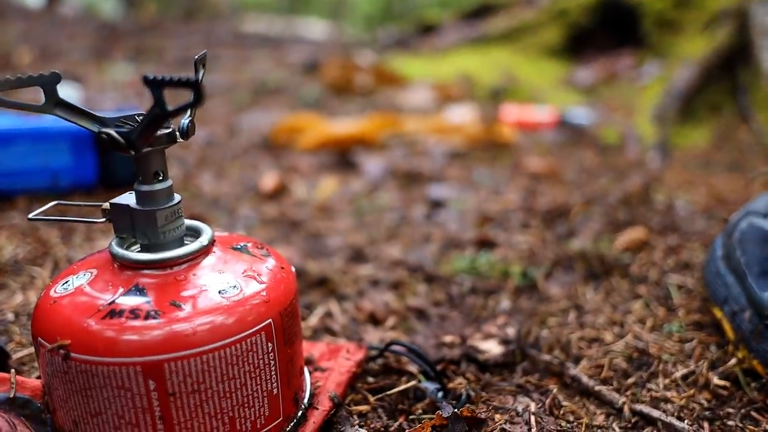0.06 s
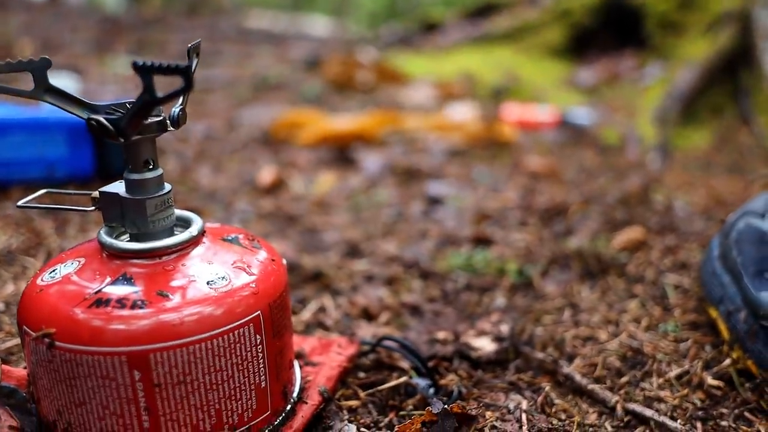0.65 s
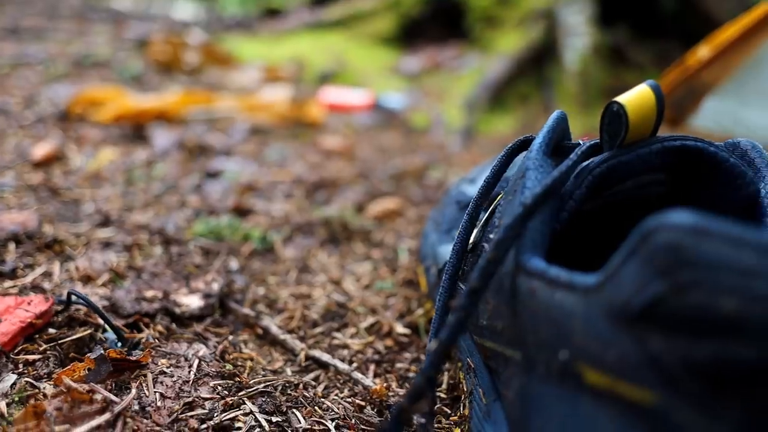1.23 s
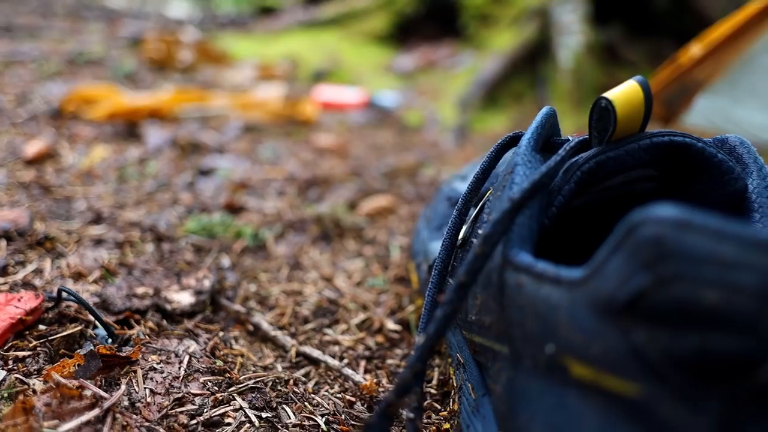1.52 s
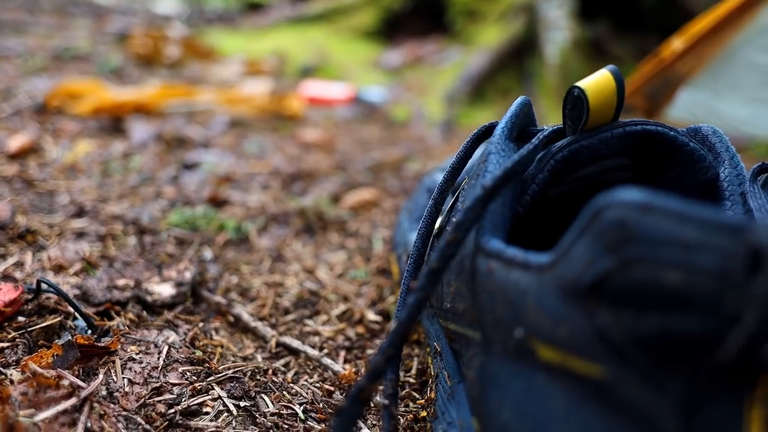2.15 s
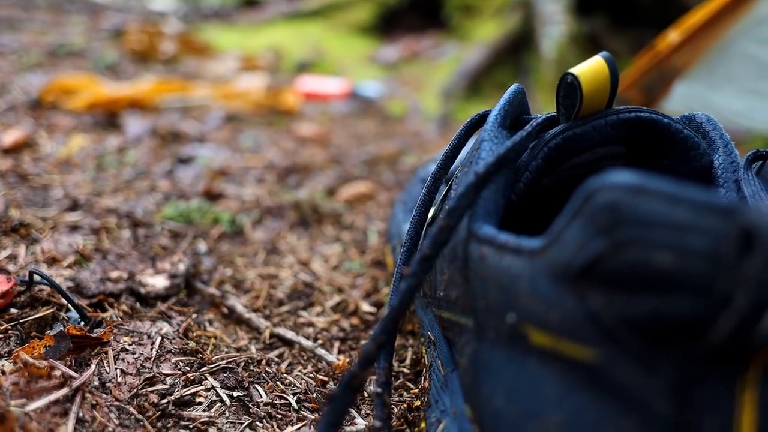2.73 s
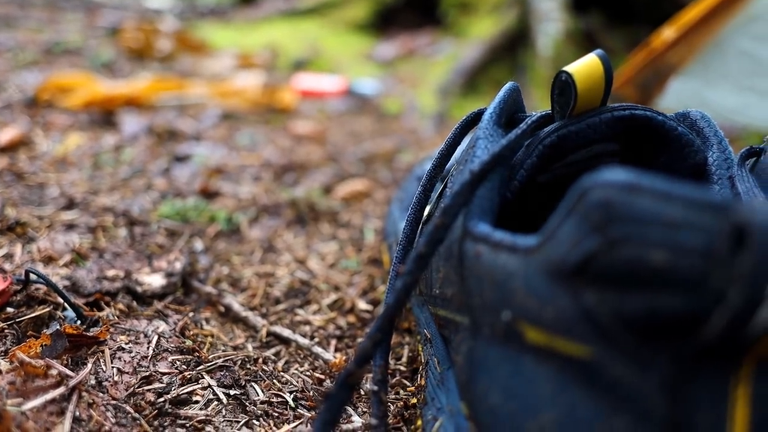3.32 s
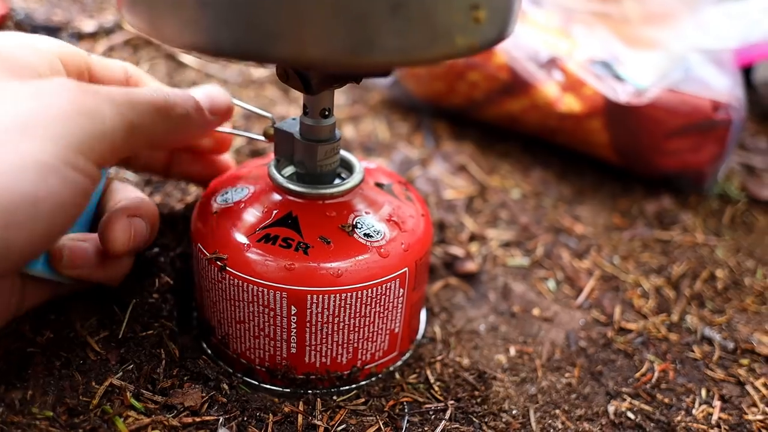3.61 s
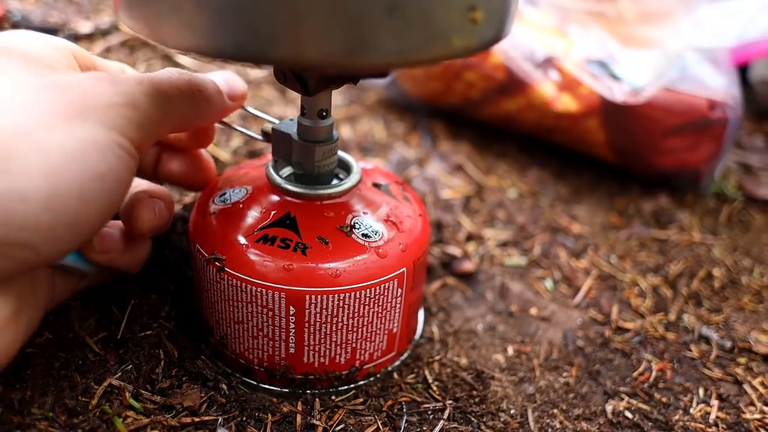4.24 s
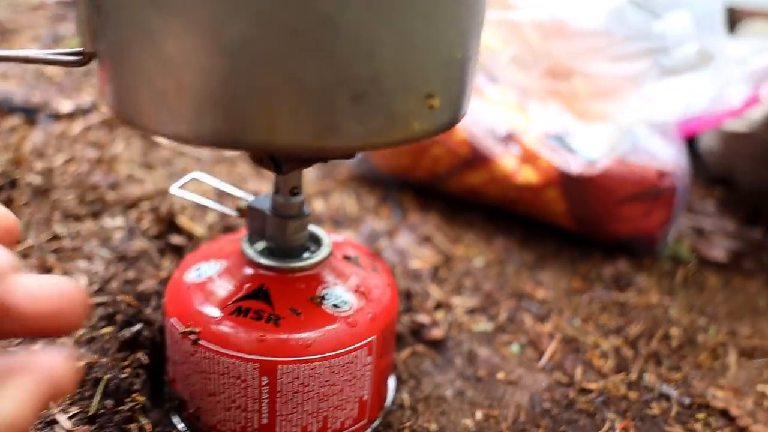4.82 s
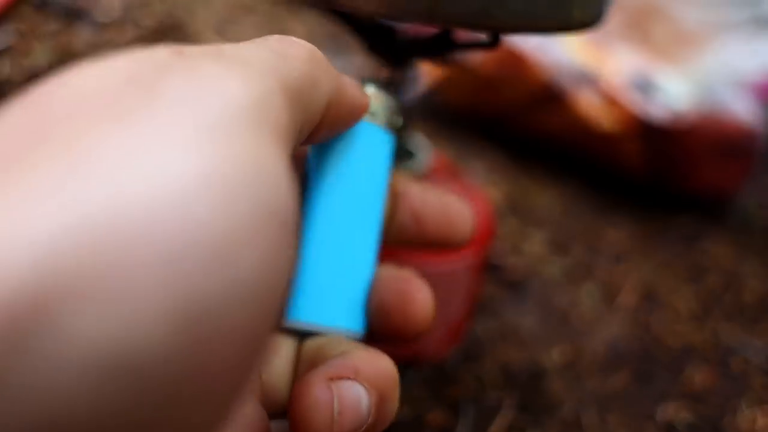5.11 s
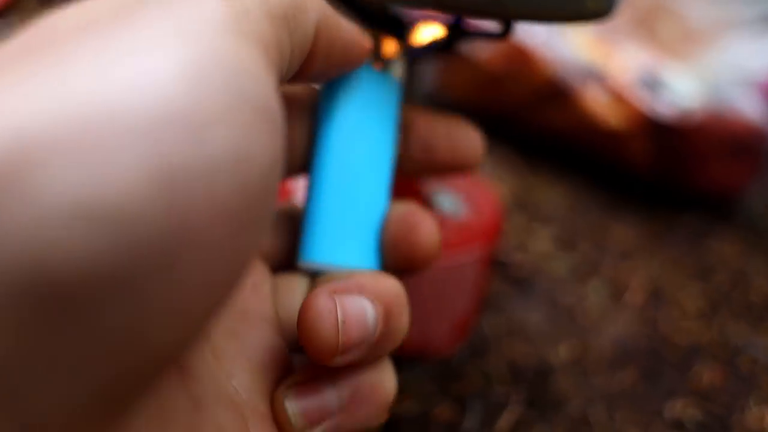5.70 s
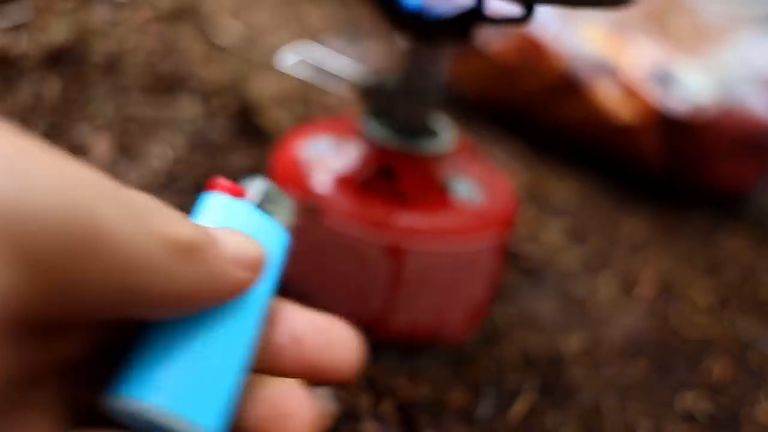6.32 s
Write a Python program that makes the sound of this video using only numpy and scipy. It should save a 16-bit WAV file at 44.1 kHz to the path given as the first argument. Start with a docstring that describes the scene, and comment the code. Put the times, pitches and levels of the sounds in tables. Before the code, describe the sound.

Soft forest air opens, with wind rumbling on the microphone, a few dry ticks in the ground litter and a small bird's thin, high phrase echoing among trees. The background turns quieter and another bird calls faintly, far off. Then a camping stove's valve opens close by with a steady, bright gas hiss. A lighter flame flutters softly, the gas catches with a pop and a low roar, and the lighter clicks once.

```python
"""A canister stove at a forest campsite: its gas jet hisses through the burner's resonances from 4.2 s.
A lighter flame flutters in the stream, the gas catches with a pop and roars, and the lighter clicks once.
Before that: forest air, gusts on the microphone, ticks in the litter and a small bird's thin, high phrase
echoing among the trees. At 3.4 s the scene cuts to a second shot with quieter forest air, and another
bird calls far off."""
import sys
import numpy as np
from scipy import signal
from scipy.fft import rfft, irfft
from scipy.io import wavfile

SR = 44100
rng = np.random.default_rng(int(sys.argv[2]) if len(sys.argv) > 2 else 0)


def master(y):
    """Save y as 16-bit WAV."""
    cut = np.clip(np.atleast_2d(y).T, -1, 1)
    pcm = np.round(cut * 32767)  # scale
    wavfile.write(sys.argv[1], SR, pcm.astype(np.int16))


N = 284886
IGNITION_S = 6.1105


def from_db(db):
    return 10 ** (np.asarray(db) / 20)


def seconds():
    return np.arange(N) / SR


def rms_one(x):
    return x / np.sqrt(np.mean(x ** 2) + 1e-20)


def switch(at_s, fade_s):
    """Linear 0-to-1 ramp centred on at_s."""
    return np.clip((seconds() - at_s) / fade_s + .5, 0, 1)


def swells(rows):
    """Sum of Gaussian gain bumps. Each row: centre in seconds, peak in dB, sigma in seconds."""
    return sum(from_db(db) * np.exp(-.5 * ((seconds() - s) / sigma_s) ** 2) for s, db, sigma_s in rows)


def drift(rate_hz):
    """Smoothed random steps, eight per cycle; rms 1."""
    steps = seconds() * rate_hz * 8
    smoothed = signal.lfilter([1], [1, -1, .25], rng.standard_normal(N // 4))[20:]
    return rms_one(np.interp(steps, np.arange(len(smoothed)), smoothed))


def coloured_noise(spectrum):
    """Noise shaped by (Hz, dB) points; rms 1."""
    hz, db = np.transpose(spectrum)
    gain = from_db(np.interp(np.log(np.fft.rfftfreq(N, 1 / SR) + 1), np.log(hz), db))
    return rms_one(irfft(rfft(rng.standard_normal(N)) * gain, N))


def resonate(x, hz, width_hz):
    """Resonator applied twice: unity peak, steep skirts."""
    b, a = signal.iirpeak(min(hz, .45 * SR), hz / (1.5 * width_hz), fs=SR)
    return signal.lfilter(b, a, signal.lfilter(b, a, x + 1e-18))


def forest(cut_s):
    """Distant air, handling bumps and wind rumble on the microphone; a quieter second shot from cut_s."""
    # Air spectra. Each row: frequency in Hz, relative density in dB.
    air_spectrum = [(35, -47), (60, -5), (118, -1.5), (183, -0.5), (266, -2.5), (359, -7), (1100, -8),
                    (1630, -12.5), (3930, -17), (4850, -19), (7540, -21.5), (8870, -24), (15500, -28.5)]
    second_shot_spectrum = [(30, -14), (60, -1), (300, -2.5), (620, -6), (1000, -9.5), (1500, -11.5),
                            (3500, -16), (4700, -14.5), (6000, -20.5), (15500, -26)]
    # Soft bumps and gusts. Each row: centre in seconds, peak in dB, sigma in seconds.
    bumps = [(0.04, -45, 0.032), (0.205, -45, 0.054), (3.38, -48, 0.02)]
    gusts = [(0.3, -49.5, 0.22), (0.9, -45, 0.038), (1.242, -41.5, 0.04), (1.43, -46, 0.03),
             (1.76, -38.5, 0.046), (2.8, -46, 0.37), (3.34, -39.5, 0.086), (4.32, -53, 0.06),
             (4.8, -49.5, 0.08)]
    air_db = -46 + 2 * np.exp(-seconds() / 0.61)
    air = from_db(air_db) * coloured_noise(air_spectrum)
    handling = swells(bumps) * rms_one(resonate(rng.standard_normal(N), 264, 32))
    second_shot_air = from_db(-55) * coloured_noise(second_shot_spectrum)
    sway_hz = 27.5 + 5 * drift(11)  # the microphone sways on its mount
    sway = rms_one(np.sin(2 * np.pi * np.cumsum(sway_hz) / SR) * from_db(3.5 * drift(10)))
    wind = from_db(-49) + swells([gust for gust in gusts if gust[0] < cut_s])
    breeze = from_db(-54.5) + swells([gust for gust in gusts if gust[0] > cut_s])
    after_cut = switch(cut_s, 0.0064)
    first_shot = air + handling + wind * sway
    return (1 - after_cut) * first_shot + after_cut * (second_shot_air + breeze * sway)


def litter_ticks(gain_db, decay_s):
    """Dry snaps in the forest litter: a bright crack over a dull body."""
    # Each row: start in seconds, relative level in dB, body re crack in dB.
    snaps = [(0.046, -28.5, 6), (0.1326, -30.5, 9.5), (0.2131, -30.5, 8), (0.476, -39, 1),
             (0.8606, -30.5, 7), (1.0669, -33, -3)]
    crack, body = np.zeros((2, N))
    for start_s, db, body_db in snaps:
        age_s = seconds() - start_s
        force = from_db(db + gain_db) * (age_s >= 0) * np.exp(-np.abs(age_s) / decay_s)
        crack += force
        body += from_db(body_db) * force
    grit = rng.standard_normal(N)
    return resonate(crack * grit, 8100, 1300) + resonate(body * grit, 880, 1030)


def note(start_s, length_s, pitches_hz, db, rasp_hz, attack_s, release_s, fade_db_per_s=0):
    """Sine on a parabola through first, middle and last pitch, roughened by the signal rasp_hz."""
    at = np.arange(int(start_s * SR), int((start_s + length_s) * SR))
    age_s = (at - at[0]) / SR
    hz = np.polyval(np.polyfit([0, .5, 1], pitches_hz, 2), age_s / length_s) + rasp_hz[at]
    gate = np.clip(np.minimum(age_s / attack_s, (length_s - age_s) / release_s), 0, 1)
    out = np.zeros(N)
    out[at] = from_db(db - fade_db_per_s * age_s) * gate * np.sin(2 * np.pi * np.cumsum(hz) / SR)
    return out


def among_trees(x, t60_s, wet_db):
    """Trunks scatter a decaying cloud of echoes."""
    t = np.arange(SR) / SR
    echoes = rng.standard_normal(SR) * from_db(-60 * t / t60_s) * (1 - np.exp(-t / 0.0017))
    wet = signal.fftconvolve(x, echoes / np.linalg.norm(echoes))[:N]
    return x + from_db(wet_db) * wet


def near_bird(gain_db, edge_s, rasp_rate_hz):
    """Curved whistles and raspy chips; each chip is a quick flick, then a louder note."""
    # Each row: start and length in seconds, first, middle and last pitch in Hz, relative level in dB,
    # attack in seconds.
    whistles = [(0.857, 0.046, 6700, 6840, 6740, -37, 0.004), (1, 0.057, 6750, 6850, 6840, -36.5, 0.008),
                (1.146, 0.268, 8420, 7855, 8140, -33, 0.0089), (1.493, 0.2, 8570, 8170, 8380, -34, 0.063),
                (1.791, 0.215, 10010, 10410, 10980, -49.5, 0.043)]
    # Each row: start and length in seconds, pitch in Hz, relative level in dB, flick and note sweep in Hz.
    chips = [(0.507, 0.036, 7830, -51.5, -200, -200), (0.902, 0.026, 6170, -37, -2400, -1450),
             (1.051, 0.023, 6230, -35, -2900, -1100), (1.408, 0.0326, 6740, -32, 1400, -50),
             (1.705, 0.038, 6720, -36.5, 1400, -100)]
    flick_s, chip_edge_s = 0.019, 0.0066
    slope, arch_hz = np.array([-.5, 0, .5]), np.array([-198, 0, -198])
    song, rasp = np.zeros(N), drift(rasp_rate_hz)
    for start_s, length_s, *pitches_hz, db, attack_s in whistles:
        song += note(start_s, length_s, pitches_hz, db, 48.3 * rasp, attack_s, edge_s, fade_db_per_s=31)
    for start_s, length_s, hz, db, flick_sweep_hz, sweep_hz in chips:
        flick_hz = hz - 250 + arch_hz + flick_sweep_hz * slope
        note_hz = hz + arch_hz + sweep_hz * slope
        song += note(start_s, flick_s, flick_hz, db - 3, 600 * rasp, chip_edge_s, chip_edge_s)
        song += note(start_s + flick_s, length_s, note_hz, db, 340 * rasp, edge_s, chip_edge_s)
    return from_db(gain_db) * among_trees(song, t60_s=0.44, wet_db=0.5)


def far_bird(edge_s, waver_rate_hz):
    """Held, wavering notes that arrive mostly as echoes."""
    # Each row: start and length in seconds, pitch in Hz, direct level in dB.
    notes = [(3.45, 0.3, 5500, -79), (3.53, 0.08, 4750, -63), (3.58, 0.16, 4230, -73),
             (3.76, 0.12, 4750, -68)]
    waver_hz = 65 * drift(waver_rate_hz)
    calls = sum(note(start_s, length_s, [hz] * 3, db, waver_hz, edge_s, edge_s)
                for start_s, length_s, hz, db in notes)
    return among_trees(calls, t60_s=0.7, wet_db=7)


def jet_gains(valve_open_s=4.1964, rise_db_per_s=249, lit_fade_db_per_s=14):
    """Tube, core and top band gains: raised by the valve, sinking once lit; the hand shades the treble."""
    # Each row: time in seconds, relative core and top band levels in dB.
    shading = [(4.2, -21, -36.5), (4.29, -19.5, -34.5), (4.44, -23.5, -31.5), (4.62, -21, -30),
               (4.66, -18, -33), (4.72, -21.5, -32.5), (4.94, -22.5, -32.5), (5.02, -25.5, -38.5),
               (5.46, -24.5, -34.5), (5.6, -27.5, -34), (5.82, -29, -39.5), (6.21, -25.5, -40.5)]
    t = seconds()
    times_s, core_points_db, top_points_db = np.transpose(shading)
    flow_db = -rise_db_per_s * np.clip(valve_open_s - t, 0, 1)
    flow_db -= lit_fade_db_per_s * np.maximum(t - IGNITION_S, 0)
    flame_damping_db = 0.5 * switch(IGNITION_S, 0.055)
    tube_db = -36.5 + 0.57 * flow_db  # mixing tube drone
    core_db = np.interp(t, times_s, core_points_db) + flow_db
    top_db = np.interp(t, times_s, top_points_db) + 0.99 * flow_db - flame_damping_db
    return from_db(tube_db), from_db(core_db), from_db(top_db)


def burner_hiss(modes, gain_db, wander_db, shared):
    """Jet turbulence drives the burner's modes; its shared part cancels between them, leaving notches."""
    common = np.sqrt(shared) * rng.standard_normal(N)
    turbulence = common + np.sqrt(1 - shared) * rng.standard_normal((2, N))
    wanders = [from_db(wander_db * drift(3)) for _ in range(4)]
    tube, core, top = np.zeros((3, N))
    for k, (hz, width_hz, db) in enumerate(modes):
        band = tube if hz < 4600 else core if hz < 9350 else top
        band += from_db(db) * wanders[k % 4] * resonate(turbulence[k % 2], hz, width_hz)
    tube_gain, core_gain, top_gain = jet_gains()
    hiss = tube_gain * rms_one(tube) + core_gain * rms_one(core) + top_gain * rms_one(top)
    return from_db(gain_db) * hiss


def past_hand(x):
    """Close echoes off the moving hand comb the sound."""
    # Each row: start, end and lag in seconds, echo-to-direct ratio.
    reflections = [(3.9, 4.6, 0.00099, 0.2), (4.65, 4.96, 0.00029, 0.27), (5.75, 5.98, 0.000537, 0.2),
                   (5.9, 6.3, 0.000372, 0.18)]
    hz, out = np.fft.rfftfreq(N, 1 / SR), x.copy()
    for start_s, end_s, lag_s, ratio in reflections:
        echo = irfft(rfft(x) * np.exp(-2j * np.pi * hz * lag_s), N)
        out += ratio * switch(start_s, .1) * (1 - switch(end_s, .1)) * echo
    return out


def gas(shield_s):
    """The hiss changes colour as the hand shields the burner, and again once it is lit."""
    # Burner resonances per state. Each row: frequency and width in Hz, relative level in dB.
    open_modes = [(720, 310, -31.5), (1770, 630, -29.5), (3460, 1170, -15), (3830, 260, -20),
                  (5130, 280, -26), (5440, 430, -12), (6550, 380, -4.5), (7240, 560, -5.5), (7970, 360, 2),
                  (8620, 240, 0.5), (8880, 420, -1), (9870, 900, -14.5), (10230, 640, -10.5),
                  (11140, 330, -16), (11800, 800, -18), (14100, 1000, -23.5), (15500, 1000, -24)]
    shielded_modes = [(685, 350, -23), (1680, 700, -20), (3414, 760, -5.5), (3940, 340, -14),
                      (5240, 310, -12.5), (5580, 230, -6), (6260, 130, -23), (7020, 560, 0.5),
                      (7390, 110, 3), (7960, 360, 4), (8330, 320, -0.5), (8580, 330, 1.5), (9360, 260, -2),
                      (10000, 530, -5), (11000, 400, -12), (11440, 1000, -15), (13900, 1400, -17.5),
                      (15400, 900, -22)]
    lit_modes = [(3490, 640, -7), (4140, 850, -14.5), (5450, 270, -11), (6430, 350, -0.5), (6790, 460, 2),
                 (7530, 76, 1), (7880, 360, 1.5), (8620, 240, 4.5), (9320, 530, -6.5), (10800, 900, -24),
                 (12800, 910, -17), (13650, 700, -17), (15000, 1200, -22)]
    free = burner_hiss(open_modes, gain_db=0.72, wander_db=1.7, shared=0.25)
    shielded = burner_hiss(shielded_modes, gain_db=0.54, wander_db=1.0, shared=0.44)
    burning = burner_hiss(lit_modes, gain_db=-0.6, wander_db=1.5, shared=0.36)
    near, lit = switch(shield_s, 0.059), switch(IGNITION_S, 0.055)
    hiss = np.sqrt(1 - near) * free + np.sqrt(near * (1 - lit)) * shielded + np.sqrt(lit) * burning
    sputter_db = 0.5 + 0.7 * lit  # the flame shakes the hiss
    return past_hand(hiss) * from_db(sputter_db * drift(39.7))


def lighter_flame():
    """The gas stream tears at the small flame in short, dull puffs."""
    # Each row: centre in seconds, peak in dB, sigma in seconds.
    puffs = [(5.015, -37, 0.0021), (5.041, -41, 0.0055), (5.122, -43, 0.007), (5.177, -38.5, 0.0048),
             (5.22, -47.5, 0.029), (5.696, -38.5, 0.011), (5.728, -34, 0.0061), (5.782, -38.5, 0.013),
             (5.858, -34.5, 0.006), (5.956, -39, 0.024), (6.020, -34, 0.014), (6.089, -32.5, 0.022)]
    spectrum = [(30, -11), (80, 2.5), (150, 0), (330, -7.5), (520, -23), (1000, -25), (3000, -26),
                (8000, -80)]
    return swells(puffs) * coloured_noise(spectrum)


def ignition(gain_db):
    """Pooled gas flares in a quick pop and a slower surge, each a pressure peak between two dips."""
    # Each row: centre in seconds, relative peak in dB, width in seconds.
    pulses = [(6.1105, -1.5, 0.0015), (6.1285, -15, 0.0052)]
    out = np.zeros(N)
    for centre_s, db, width_s in pulses:
        u = (seconds() - centre_s) / width_s
        out += from_db(db + gain_db) * (1 - u ** 2) * np.exp(-u ** 2 / 2)
    return out


def flame_strength(fade_db_per_s=2, rise_s=0.049):
    """Flame envelope: a flash as the gas catches, then a slowly fading burn."""
    age_s = np.maximum(seconds() - IGNITION_S, 0)
    ripple_s = seconds() - 5.3  # the ripple is all but gone by ignition
    ripple_db = 6.5 * np.cos(2 * np.pi * ripple_s / 0.104) * np.exp(-np.maximum(ripple_s, 0) / 0.13)
    flash = swells([(IGNITION_S, -15, 0.0056)])
    return flash + from_db(-24 - fade_db_per_s * age_s + ripple_db) * switch(IGNITION_S, rise_s)


def roar(gain_db, rough_db, notch_hz):
    """Uneven bursts of burning gas resound between burner, pot and ground, with one midrange notch."""
    # Each row: frequency and width in Hz, relative level in dB.
    modes = [(60, 74, -14), (164, 98, 0), (276, 113, 2), (371, 127, -3.5), (535, 70, -7), (647, 135, -5.5),
             (1240, 290, -13.5), (1620, 380, -13.5), (1880, 190, -18)]
    bursts = rng.standard_normal((2, N)) * from_db(rough_db * drift(120))
    body = sum(from_db(db) * resonate(bursts[k % 2], hz, width_hz)
               for k, (hz, width_hz, db) in enumerate(modes))
    body = signal.lfilter(*signal.iirnotch(notch_hz, 5, fs=SR), body)
    return from_db(gain_db) * flame_strength() * rms_one(body)


def ring(x, hz, t60_s):
    """Damped mode: a unit impulse rings a sine of height 1."""
    r, w = from_db(-60 / (t60_s * SR)), 2 * np.pi * hz / SR
    return signal.lfilter([0, np.sin(w)], [1, -2 * r * np.cos(w), r * r], x + 1e-18)


def lighter_click(at_s):
    """One hard contact rings the lighter's short-lived modes."""
    # Each row: frequency in Hz, level in dB, t60 in seconds.
    modes = [(3230, -12.5, 0.0067), (3880, -6.5, 0.0095), (5270, -15, 0.0064), (6100, -13, 0.007),
             (7560, -4, 0.0055), (10450, -6.5, 0.0059), (14300, -8, 0.0035)]
    blow = np.zeros(N)
    blow[round(at_s * SR)] = 1
    return sum(from_db(db) * ring(blow, hz, t60_s) * (-1) ** k for k, (hz, db, t60_s) in enumerate(modes))


def scene():
    """Forest, birds, stove and lighter; one microphone on both channels."""
    outdoors = forest(cut_s=3.403) + litter_ticks(gain_db=3.5, decay_s=0.0011)
    birds = near_bird(gain_db=1.5, edge_s=0.0038, rasp_rate_hz=497.5)
    birds += far_bird(edge_s=0.025, waver_rate_hz=150)
    stove = gas(shield_s=5.0) + ignition(gain_db=-1) + roar(gain_db=1.5, rough_db=2, notch_hz=1020)
    lighter = lighter_flame() + lighter_click(at_s=6.2978)
    return np.tile(outdoors + birds + stove + lighter, (2, 1))


def record(dry):
    """Clip at full scale, then low-pass at 15.72 kHz."""
    lowpass = signal.ellip(10, .1, 70, 15720, fs=SR, output="sos")
    return signal.sosfilt(lowpass, np.clip(dry, -1, 1))


dry = scene()
out = record(dry)
master(out)
```